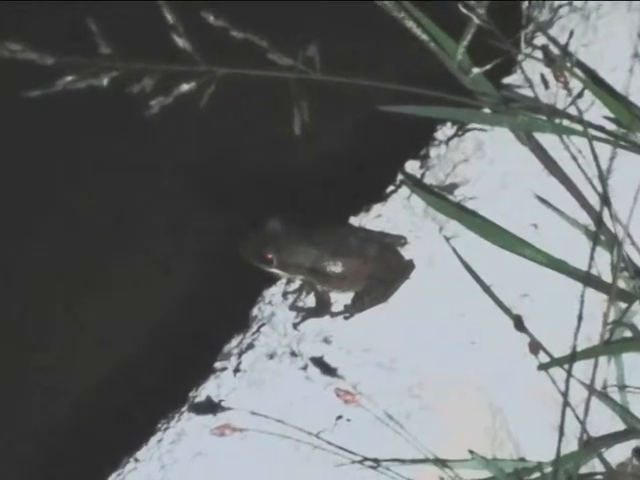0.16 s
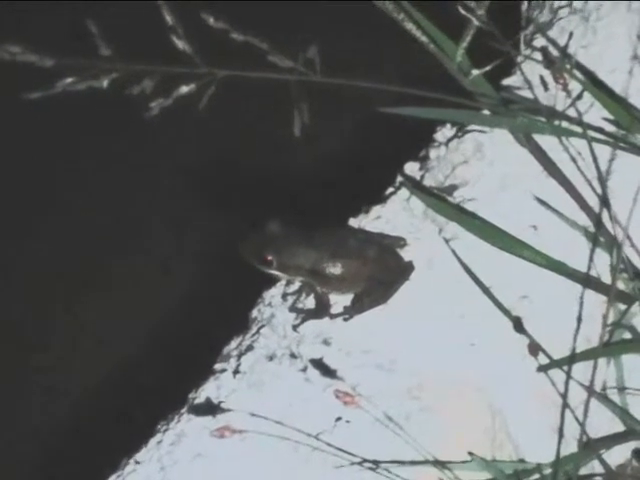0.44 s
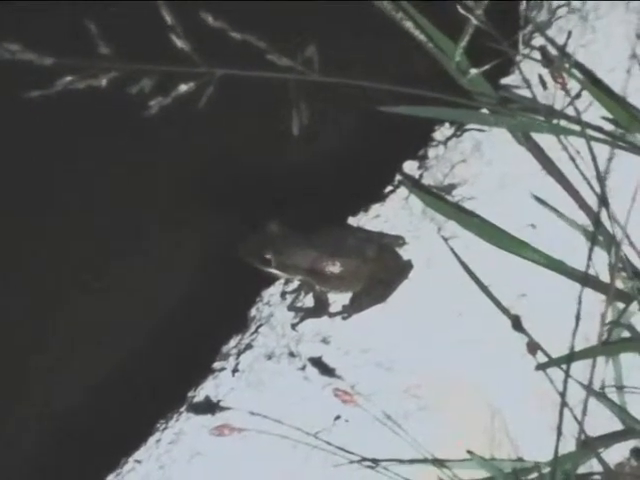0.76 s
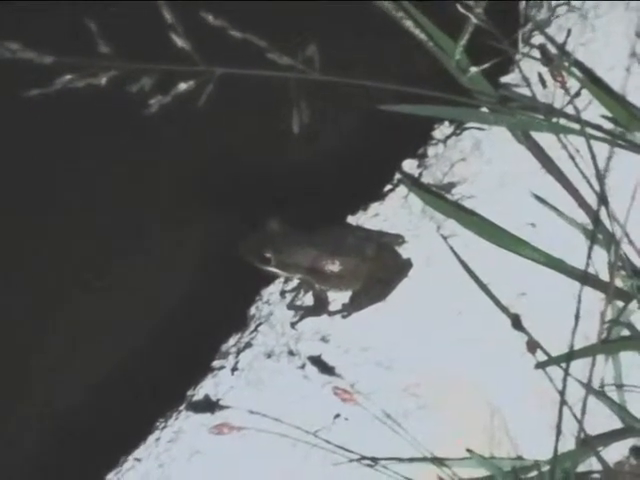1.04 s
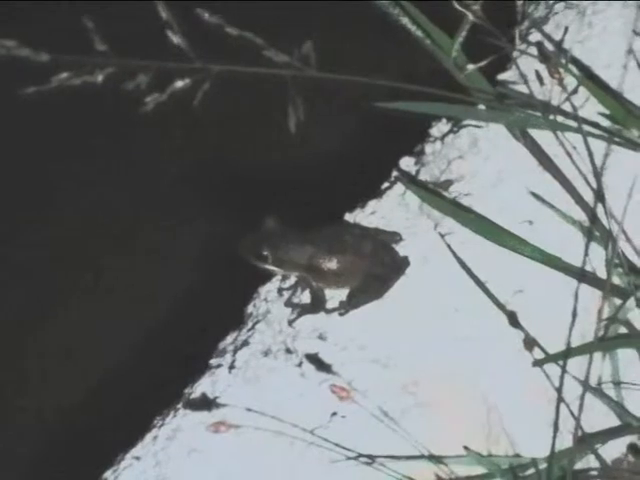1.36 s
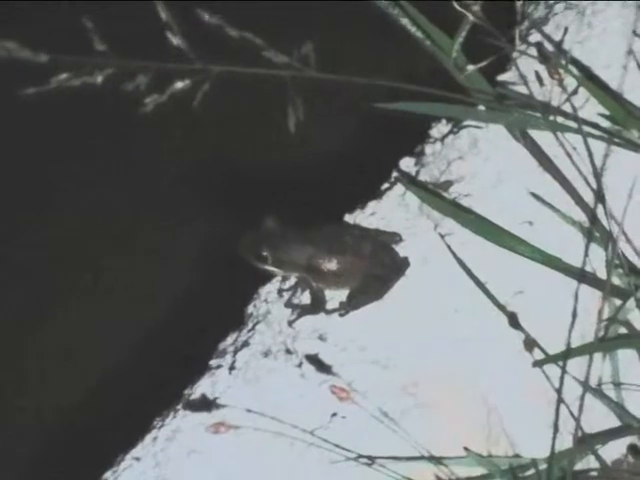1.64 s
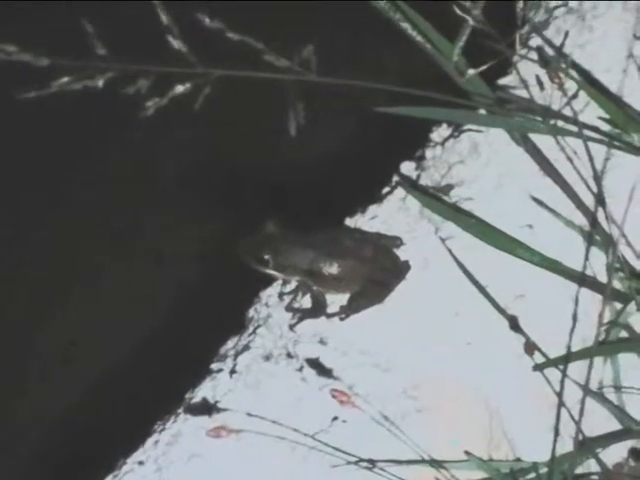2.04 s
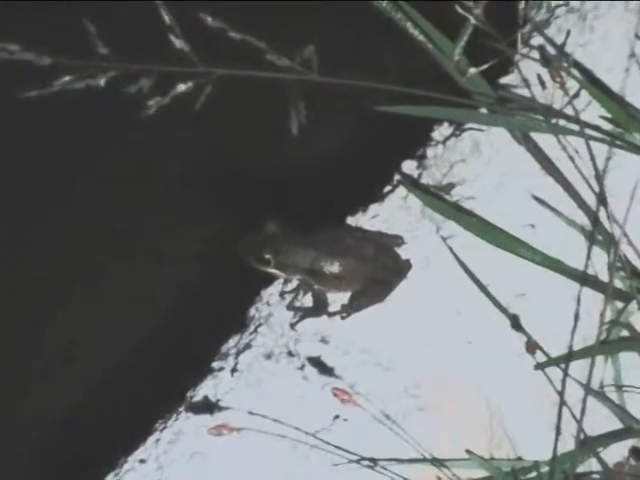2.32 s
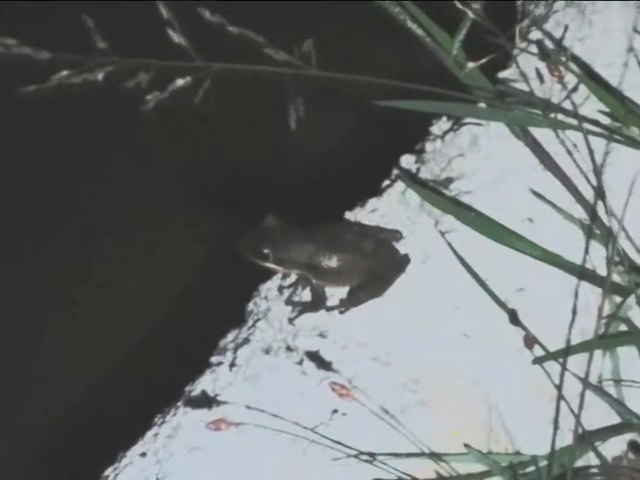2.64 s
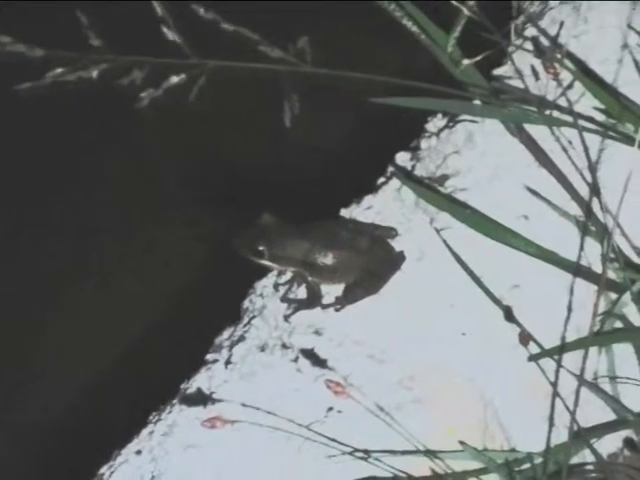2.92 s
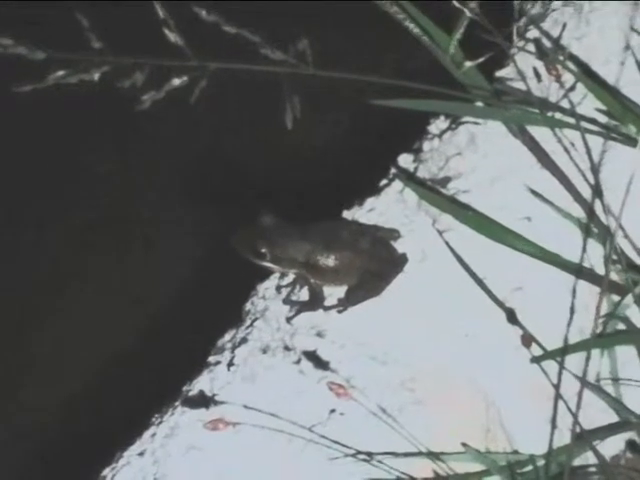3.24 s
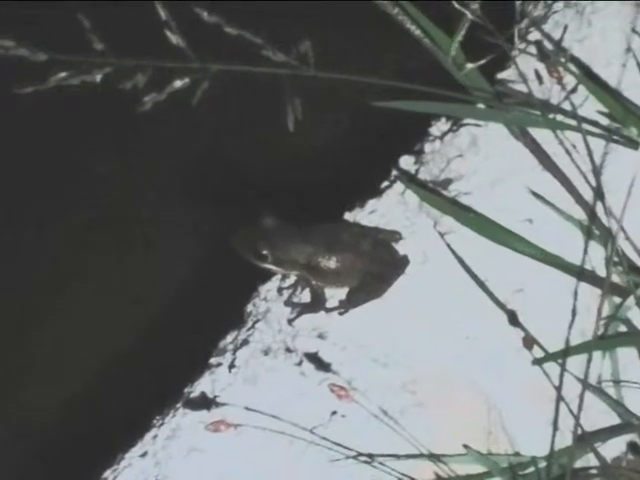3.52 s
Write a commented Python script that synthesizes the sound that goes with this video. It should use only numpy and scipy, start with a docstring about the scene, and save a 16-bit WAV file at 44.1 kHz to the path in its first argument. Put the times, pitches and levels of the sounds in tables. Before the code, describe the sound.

A loud, close cricket trill starts almost at once and runs steadily to the end, about 28 falling chirps a second; two frogs croak alternately behind it, over a faint night chorus at a pond edge, recorded close outdoors.

```python
"""The edge of a night pond: a cricket trills close by, some 28 chirps a second, each a falling tone.
Two frogs croak in turn behind it, as pulses ringing in throat modes; others quack, rasp, grunt and plop.
A high insect buzzes in bursts of ticks. A distant cricket, throbbing bands of far callers
and noise for the night air lie behind."""
import sys
import numpy as np
from scipy import signal
from scipy.fft import rfft, irfft
from scipy.io import wavfile
from scipy.ndimage import uniform_filter1d

SR = 44100
rng = np.random.default_rng(int(sys.argv[2]) if len(sys.argv) > 2 else 0)


def dump_mix(stems):
    """Bounce the given channels to the path in sys.argv[1] as a 16-bit WAV at rate SR."""
    frames = np.atleast_2d(stems).T  # one column per channel
    limited = np.clip(frames, -1, 1)  # hard clip at full scale
    pcm = np.round(limited * 32767).astype(np.int16)
    wavfile.write(sys.argv[1], SR, pcm)


def attenuation_scalar(level_db):
    """Turn a level in dB into a linear amplitude multiplier (20 dB per decade)."""
    decades = np.asarray(level_db, float) / 20
    return 10 ** decades


N = 162288
HZ = np.fft.rfftfreq(N, 1 / SR)


def read(points, hz):
    """Reads a curve of (f/Hz, value) along a logarithmic frequency axis."""
    f, value = np.transpose(points)
    return np.interp(np.log(hz + 1), np.log(f + 1), value)


def evened(x):
    """Scales to rms 1."""
    return x / np.sqrt(np.mean(x ** 2) + 1e-20)


def add(mix, s, sound):
    """Lays a sound into the mix from s seconds on."""
    part = mix[max(round(s * SR), 0):][:len(sound)]
    part += sound[:len(part)]


def slow(per_s, size):
    """Smooth chance of rms 1: noise through two equal one-pole low-passes at per_s Hz."""
    poles = [np.exp(-2 * np.pi * per_s / SR)] * 2
    return evened(signal.lfilter([1], np.poly(poles), rng.standard_normal(size)))


def pair(gain, same):
    """Two partly alike noise channels with a gain per frequency."""
    a, b = rfft(rng.standard_normal((2, N)))
    same = np.clip(same, 0, 1)
    right = same * a + np.sqrt(1 - same ** 2) * b
    return evened(irfft(gain * np.array([a, right]), N))


def band(hz, wide_hz, same):
    """Noise pair around one pitch; wide_hz is the width at half amplitude."""
    return pair(1 / (1 + ((HZ - hz) / wide_hz * 2) ** 2), same)


def ring(hz, db, rise_ms, fall_ms, turn=.0):
    """One pulse in one mode, swelling and dying exponentially; its crest lies 8 ms in."""
    ms = np.arange(-8, 30, 1000 / SR)
    env = attenuation_scalar(db) * np.exp(-abs(ms) / np.where(ms < 0, rise_ms, fall_ms))
    return env * np.cos(2 * np.pi * (hz * ms / 1000 + turn + 0.1 * rng.standard_normal()))


# near trill, one row per chirp: (crest t/s, crest level/dB, start before the crest t/ms)
CHIRPS = [(0.3239, -11.0, 8.7), (0.3623, -7.5, 14), (0.3991, -4.0, 16), (0.4344, -4, 13.6),
          (0.4675, -4, 14.4), (0.5018, -4, 12.2), (0.5355, -3.5, 11.3), (0.5693, -5, 13.3),
          (0.6034, -5, 13.7), (0.6367, -5, 13.7), (0.671, -5, 13.4), (0.7056, -4.5, 13), (0.741, -5, 12.6),
          (0.7739, -3.5, 9.6), (0.809, -4, 9.9), (0.8439, -5, 11.9), (0.879, -4, 13), (0.9137, -4.5, 12.8),
          (0.9502, -4.5, 14), (0.9827, -5, 10), (1.019, -5, 11.3), (1.055, -6, 12.3), (1.0912, -6, 13.5),
          (1.126, -6.5, 11), (1.1616, -4.5, 14.2), (1.1973, -5.0, 15.3), (1.2324, -4.7, 12.8),
          (1.2699, -4.5, 16), (1.3042, -4, 14), (1.3415, -4.5, 15.5), (1.3788, -4, 14.4),
          (1.4171, -5, 16.5), (1.4527, -4, 15.2), (1.4902, -4.5, 13), (1.5263, -4.9, 15.5),
          (1.5609, -4.5, 12.7), (1.598, -4.4, 15.8), (1.6346, -4, 14.2), (1.6697, -4.5, 14),
          (1.7057, -4.6, 14), (1.7404, -4.5, 13.4), (1.7768, -4, 13.6), (1.8139, -5, 19.1),
          (1.8488, -4, 15.4), (1.8839, -4.5, 13), (1.921, -4.5, 12.5), (1.9564, -5, 13), (1.9919, -4, 16.6),
          (2.0283, -5.2, 17.6), (2.064, -5.5, 16.5), (2.099, -4.5, 12.7), (2.1358, -4.6, 16.3),
          (2.1733, -4.5, 14.2), (2.209, -4, 13.3), (2.2464, -4, 14), (2.283, -4, 14.4),
          (2.3195, -5.5, 14.0), (2.3558, -4.5, 17.8), (2.3913, -5, 16.3), (2.4266, -4.5, 15.5),
          (2.463, -4.5, 16), (2.5002, -4.8, 16.6), (2.536, -4.5, 15.4), (2.5701, -4.7, 13.5),
          (2.607, -4.5, 14.5), (2.6428, -4.3, 13.3), (2.6786, -4, 15.2), (2.7116, -4.3, 13.3),
          (2.7483, -5, 14.4), (2.7848, -5.5, 12.5), (2.8214, -5.0, 13), (2.8558, -4.8, 12.7),
          (2.8926, -5, 14), (2.9286, -4.5, 15.2), (2.9629, -4, 12.5), (2.9979, -4.7, 13.2),
          (3.034, -4.5, 13.7), (3.0706, -5, 14.7), (3.1062, -5.9, 13), (3.1426, -5.5, 13.7),
          (3.1787, -5.1, 15), (3.2146, -4.6, 16), (3.2512, -5.2, 15.2), (3.2863, -5.6, 14.3),
          (3.322, -4.5, 18), (3.3596, -4.5, 15.3), (3.3956, -4.5, 11.1), (3.431, -4.5, 15.7),
          (3.468, -4.6, 17), (3.5045, -4.4, 15.6), (3.5403, -4, 17.7), (3.5761, -4.5, 13.7),
          (3.6122, -5, 12.7), (3.649, -4.5, 14.3), (3.6852, -5, 15.5)]
# one wing stroke: (t/ms from the crest, level/dB, f/Hz)
STROKE = [(-15, -9.5, 3720), (-11, -6, 3650), (-10, -2.5, 3595), (-5, -3, 3530), (-2.5, 0.5, 3465),
          (1, 1, 3377), (4.5, -3.5, 3250), (7, -9.5, 3112), (10.5, -14, 3186), (10, -12.5, 3115),
          (12.5, -30, 3230), (13, -51, 2920)]
# overtones: (multiple of the pitch, loudest at f/Hz, width f/Hz, level/dB added there, level/dB everywhere)
OVERTONES = [(2, 6418, 150, -21, -44), (3, 10160, 390, -27.5, -45.5), (4, 12700, 1100, -38, -43)]
START_MS, LATE_MS = 1.62, 9.54  # onset for a lead 3.5 ms beyond LATE_MS; shorter leads start harder
WOBBLE_DB, SOFT_MS_PER_DB = .3, .35  # level wobble, rms; soft chirps also start gently
WOBBLE_HZ, WARM_HZ_PER_DB = 11.5, 10.5  # pitch wobble, rms; soft chirps sit lower
OVERSHOOT_HZ, OVERSHOOT_MS = 216, 0.98  # all but the softest chirps start sharp
TAIL_MS = 7.5  # overtones are gone by here
BLIP_DB, BLIP_HZ, BLIP_MS = -42, 13000, 13.5  # a faint high blip follows
TICK_MS = 0.75


def trill():
    """Each wing stroke is a falling tone with faint overtones, a tick at its start and a little scrape."""
    out, stroke, ticks = np.zeros(N), np.zeros(N), np.zeros(N)
    ms = np.arange(-20, 16, 1000 / SR)
    at, level, pitch = np.transpose(STROKE)
    driven = np.clip((TAIL_MS - ms) / 1.5, 0, 1)
    for s, db, lead in CHIRPS:
        start = s + ms[0] / 1000
        onset_ms = np.clip(START_MS * (lead - LATE_MS) / 3.5, .7, 3) + SOFT_MS_PER_DB * max(-4 - db, 0)
        env = attenuation_scalar(db + np.interp(ms, at, level) + WOBBLE_DB * slow(140, len(ms)))
        env *= np.clip((ms + lead) / onset_ms + .5, 0, 1) ** 2
        hz = np.interp(ms, at, pitch) + WOBBLE_HZ * slow(186, len(ms)) + WARM_HZ_PER_DB * (db + 5.0)
        hz += OVERSHOOT_HZ * (db > -6.7) * np.exp(-np.maximum(ms + lead, 0) / OVERSHOOT_MS)
        phase = 2 * np.pi * (np.cumsum(hz) / SR + rng.random())
        tone = np.sin(phase)
        for k, best, wide, top_db, low_db in OVERTONES:
            gain = attenuation_scalar(top_db) * np.exp(-.5 * ((k * hz - best) / wide) ** 2) + attenuation_scalar(low_db)
            tone += driven * gain * np.sin(k * phase)
        blip = attenuation_scalar(db + BLIP_DB + 3.5 * rng.standard_normal()) * np.exp(-.5 * (ms - BLIP_MS) ** 2)
        blip *= np.sin(2 * np.pi * BLIP_HZ * ms / 1000)
        tick = attenuation_scalar(db + 2 * rng.standard_normal()) * np.exp(-.5 * ((ms + lead) / TICK_MS) ** 2)
        add(out, start, env * tone + blip)
        add(stroke, start, env)
        add(ticks, start, tick)
    return out, scrape_and_floor(stroke, ticks)


# colour of scrape and treble floor, before their levels: (f/Hz, level/dB)
SCRAPE = [(400, -70), (2000, -21), (4200, 2.5), (6000, -1), (9000, -14), (12000, -2), (15000, -11)]
SCRAPE_DB, TICK_DB = -43, -46.5
FLOOR_DB, FLOOR_S = -41.5, 0.029  # level, and time over which the floor smooths the trill's envelope
FLOOR_VARIES_DB = 5  # rms


def scrape_and_floor(stroke, ticks):
    """Noise scrapes with the strokes and ticks at chirp starts; a faint treble floor rises with the trill."""
    smoothed = uniform_filter1d(stroke, int(FLOOR_S * SR))
    noise = pair(attenuation_scalar(read(SCRAPE, HZ)), 0.92)
    treble_floor = attenuation_scalar(FLOOR_DB + FLOOR_VARIES_DB * slow(90, N)) * smoothed
    rub = noise * (attenuation_scalar(SCRAPE_DB) * stroke + treble_floor + attenuation_scalar(TICK_DB + 15.0) * ticks)
    return rub + attenuation_scalar(TICK_DB) * ticks * band(5500, 1500, 0.98)


# croaks of two frogs: (first pulse t/s, last pulse t/s, pulses, level/dB)
SHARP_CROAKS = [(.537, .627, 9, -13.5), (.994, 1.106, 10, -13), (1.389, 1.481, 9, -12),
                (1.771, 1.873, 10, -13.5), (2.163, 2.265, 10, -14), (2.67, 2.772, 10, -14),
                (3.044, 3.143, 10, -13), (3.535, 3.634, 10, -14)]
RINGING_CROAKS = [(.41, .474, 6, -17.5), (.871, .947, 7, -19.5), (1.243, 1.316, 7, -18),
                  (1.569, 1.655, 8, -19), (1.975, 2.064, 8, -18.5), (2.527, 2.616, 8, -19),
                  (2.843, 2.931, 8, -19), (3.211, 3.299, 8, -19.5)]
# throat modes over a croak: (first f/Hz, last f/Hz, lead-in pulse level/dB, first level/dB,
# level/dB at 60 % of the call, last level/dB, rise t/ms, fall t/ms)
SHARP_THROAT = [(1743, 1907, -14.5, -5.5, 2.5, -5.5, 0.79, 1.43),
                (1380, 1400, -18, -7.5, -10, -11, 1.8, 0.94), (858, 840, -18, -17.5, -17, -35, 1.9, 1.3),
                (1096, 1660, -39, -16, -20, -20, 1.8, 2.1)]
RINGING_THROAT = [(1738, 1750, -10.5, -5, -1, -9, 0.21, 8.8), (1310, 1404, -33, -4.5, -1.5, -7, 1.35, 0.7),
                  (786, 905, -16.5, -12.5, -18, -33, 1.8, 7.5), (1134, 3060, -61, -12, -5, -24, 1.7, 2.4)]
LEAD_IN_S, FIRST_GAP, JITTER_MS = .013, .74, .4  # FIRST_GAP in later gaps; jitter rms


def croaks(rows, throat):
    """A soft lead-in, then even pulses after a short first gap; most throat modes rise through the call."""
    out = np.zeros(N)
    for first, last, pulses, db in rows:
        steps = np.maximum(np.arange(round(pulses)) - 1 + FIRST_GAP, 0)
        lead_in = sum(ring(a, db + soft, 1.5, fall) for a, b, soft, p, q, r, rise, fall in throat)
        add(out, first - LEAD_IN_S - .008, lead_in)
        for u in steps / steps[-1]:
            s = first + u * (last - first) + JITTER_MS / 1000 * rng.standard_normal()
            size = 0.92 * rng.standard_normal()
            pulse = sum(ring(a + (b - a) * u, db + size + np.interp(u, [0, .6, 1], [p, q, r]), rise, fall)
                        for a, b, soft, p, q, r, rise, fall in throat)
            add(out, s - .008, pulse)
    return out


QUACK_FADE_DB, BRIGHTEN_DB = -15.5, 5  # by the call's end, at 1300 Hz; extra dB per octave above it
UNEVEN, UNEVEN_DB = .24, 2.5  # spread of the pulses in time (periods) and level, rms


def rough(rows, throat):
    """Uneven pulses ring the throat modes and fade, the high modes less."""
    out = np.zeros(N)
    for s, length, db, rate in rows:
        for k, (late, size) in enumerate(rng.standard_normal((40, 2))):
            t = (k + UNEVEN * late * (k > 0)) / rate
            if t >= length:
                continue
            pulse = 0
            for hz, mode_db, fall in throat:
                fade_db = (QUACK_FADE_DB + BRIGHTEN_DB * np.log2(hz / 1300)) * t / length
                pulse_db = db + mode_db + fade_db + UNEVEN_DB * size * (k > 0)
                pulse = pulse + ring(hz, pulse_db, 0.69, fall, 0.23 + 0.062 * k * late)
            add(out, s + t - .008, pulse)
    return out


# rough calls: (t/s, length t/s, level/dB, pulses per s)
QUACKS = [(.2022, 0.043, -8.5, 135), (2.358, 0.057, -11, 150), (2.333, 0.02, -31.5, 200)]
RASPS = [(.958, 0.012, -7, 84.8), (1.02, 0.026, -23, 113.7), (1.044, .075, -14.5, 109.9)]
GRUNTS = [(.52, 0.034, -31, 89.4), (.545, 0.063, -25, 89.6), (.985, 0.18, -29, 88.5),
          (1.245, 0.12, -28.5, 89.7)]
# their throat modes: (f/Hz, level/dB, fall t/ms)
QUACK_THROAT = [(734, -10, 2.9), (1010, -8.5, 2.4), (1330, -0.5, 1.56), (1500, -16, 3.7),
                (1890, -14.5, 4.8)]
RASP_THROAT = [(1550, -4.5, 3.4), (1880, 0.5, 1.8), (2210, -8, 3.2), (2440, -15, 1.8)]
GRUNT_THROAT = [(557, -0.5, 2.9), (660, -2, 1.6), (328, -2.5, 5.1)]
# single plops: (t/s, level/dB, f/Hz)
PLOPS = [(2.11, -34.5, 560), (1.333, -25, 523), (1.608, -36.5, 510), (1.688, -34.5, 494), (1.762, -32, 506),
         (1.837, -30, 504)]
PLOP_MS = 4.7  # fall


def quacks():
    """Quacks, rasps and grunts of rough pulses, and single low plops of two decaying modes."""
    out = rough(QUACKS, QUACK_THROAT) + rough(RASPS, RASP_THROAT) + rough(GRUNTS, GRUNT_THROAT)
    for s, db, hz in PLOPS:
        add(out, s - .008, ring(hz, db, 1.6, PLOP_MS) + ring(1.3 * hz, db, 1.0, 0.27 * PLOP_MS))
    return out


# high insect bursts: (start t/s, length t/s, level/dB)
BUZZES = [(.135, .235, -44.5), (.49, 0.2, -48), (.86, 0.21, -45.5), (1.22, 0.22, -48), (1.6, .19, -46),
          (1.95, 0.21, -46), (2.29, .23, -47), (2.66, 0.2, -47.5), (2.99, 0.26, -49), (3.37, .21, -47.5)]
BUZZ_HZ, BUZZ_WIDE_HZ = 7250, 330
BUZZ_FROM_PER_S, BUZZ_TO_PER_S = 95, 175  # tick rate, reached after 35 % of a burst


def buzz():
    """Narrow-band noise in bursts of ticks that speed up and blur."""
    env = np.zeros(N)
    for s, length, db in BUZZES:
        t = np.arange(0, length, 1 / SR)
        turns = np.cumsum(np.interp(t / length, [0, .35], [BUZZ_FROM_PER_S, BUZZ_TO_PER_S])) / SR
        fade = np.clip(np.minimum(t / 0.029, (length - t) / 0.024), 0, 1)
        add(env, s, attenuation_scalar(db) * fade * (0.28 + 1.7 * np.exp(-(turns % 1) / 0.52)))
    return env * band(BUZZ_HZ, BUZZ_WIDE_HZ, 0.68) * attenuation_scalar(np.array([[-.8], [.8]]))


# dry ticks: (t/s, level/dB)
FAR_TICKS = [(.007, -25), (.0185, -14), (.0575, -19), (.0705, -19), (.1225, -21), (.1745, -26), (.222, -35)]
FAR_TRILL_PER_S, FAR_TRILL_S, FAR_TRILL_DB = 26.6, .027, -33.5  # chirp rate, first crest, level
FAR_TRILL_HZ, FAR_FALL_HZ = 3485, 343  # pitch at the crest, fall per chirp period


def far_cricket():
    """A second, distant trill of falling tones, and a few dry ticks."""
    u = (FAR_TRILL_PER_S * (np.arange(N) / SR - FAR_TRILL_S) + .5) % 1 - .5  # periods from the crest
    env = attenuation_scalar(FAR_TRILL_DB + 3.9 * slow(15, N)) * np.exp(-.5 * (u / 0.12) ** 2)
    out = env * np.sin(2 * np.pi * np.cumsum(FAR_TRILL_HZ - FAR_FALL_HZ * u) / SR)
    for s, db in FAR_TICKS:
        add(out, s - .008, ring(3230, db, 0.62, 0.82) + ring(2940, db - 6, 0.39, 0.71))
    return out


# far callers: (f/Hz, width f/Hz, throbs per s, first throb t/s, throb depth level/dB, level/dB)
FAR = [(3370, 260, 15, 0.025, 10, -37.5), (1804, 320, 71, 0.0099, 6, -40),
       (8850, 870, 7.8, 0.034, 14, -59.5), (336, 51, 7.5, 0.083, -1, -59.5)]
# level of a far rattle: (t/s, level/dB)
FAR_RATTLE = [(0, -55), (.3, -44), (.36, -37), (.47, -36), (.85, -61), (.9, -38), (1.2, -45), (2.0, -38.5),
              (2.1, -35), (2.2, -42.5), (3.15, -59), (3.22, -36.5), (3.45, -37.5), (3.5, -51)]
RATTLE_HZ = 2676
# night air colour, before its overall level: (f/Hz, level/dB)
AIR = [(20, -60), (40, -33), (70, -24), (150, -8), (400, -8), (900, -4.5), (1500, -4), (2300, -3),
       (4000, -4.5), (6000, -15), (10000, -14.5), (15000, -37)]
AIR_DB = -40
# left-right likeness of the air: (f/Hz, likeness 0..1)
SAME = [(30, 0.34), (150, 0.56), (400, 0.42), (1000, 0.93), (4000, .8), (12000, 1)]


def chorus():
    """Far callers blur into throbbing noise bands over the night air, a wide coloured noise."""
    t = np.arange(N) / SR
    out = attenuation_scalar(AIR_DB + 2.6 * slow(4.9, N)) * pair(attenuation_scalar(read(AIR, HZ)), read(SAME, HZ))
    for hz, wide, rate, first, depth_db, db in FAR:
        throb = np.cos(2 * np.pi * (rate * (t - first) + 0.027 * slow(2.2, N)))
        out += attenuation_scalar(db + depth_db / 2 * throb + 4.6 * slow(2.9, N)) * band(hz, wide, 0.84)
    rattle = attenuation_scalar(np.interp(t, *np.transpose(FAR_RATTLE)) + 2.4 * slow(35, N))
    return out + rattle * band(RATTLE_HZ, 680, 0.92)


BANK_T60, SHARED = 0.068, 0.61  # decay by 60 dB in s; weight of the echoes common to both sides


def bank(x, wet_db):
    """Short echoes from water, bank and grass, partly the same at both sides: sparse decaying taps."""
    t = np.arange(int(.25 * SR)) / SR
    taps = rng.standard_normal((3, len(t))) * (rng.random((3, len(t))) < .05)
    taps *= attenuation_scalar(-60 * t / BANK_T60) * (t > .002)
    taps = SHARED * taps[0] + (1 - SHARED) * taps[1:]
    echoes = signal.fftconvolve(x[None], taps / np.linalg.norm(taps[0]), axes=1)[:, :N]
    return x + attenuation_scalar(wet_db) * echoes


TRILL_WET_DB, FROG_WET_DB, LOW_CUT_HZ = -21.5, -6.5, 432


def scene():
    """Places the callers left and right, with their echoes, and sums all layers."""
    tone, rub = trill()
    frogs = bank(croaks(SHARP_CROAKS, SHARP_THROAT), FROG_WET_DB) * attenuation_scalar(np.array([[.3], [-.3]]))
    frogs += bank(croaks(RINGING_CROAKS, RINGING_THROAT), FROG_WET_DB)
    frogs += bank(quacks(), FROG_WET_DB) * attenuation_scalar(np.array([[-.8], [.8]]))
    # the microphone's low cut, applied to the frogs
    frogs = signal.sosfilt(signal.butter(4, LOW_CUT_HZ, "high", fs=SR, output="sos"), frogs)
    near = bank(tone, TRILL_WET_DB) * attenuation_scalar(np.array([[-.3], [.3]])) + rub
    return near + frogs + buzz() + chorus() + bank(far_cricket(), -8.5)


def top_cut(x):
    """Nothing passes above the cut-off."""
    return signal.sosfilt(signal.butter(12, 15690, fs=SR, output="sos"), x)


def record(dry):
    """Limits the band to 15.7 kHz with a steep low-pass and finishes the mix."""
    low_pass = signal.firwin(255, 15700, window=("kaiser", 9), fs=SR)
    mix = signal.oaconvolve(dry, low_pass[None], "same")
    return top_cut(mix)


dry = scene()
out = record(dry)
dump_mix(out)
```